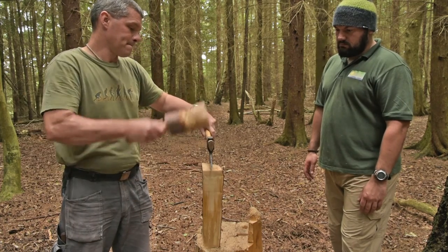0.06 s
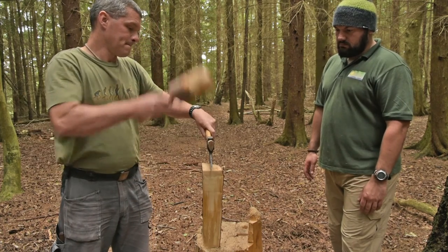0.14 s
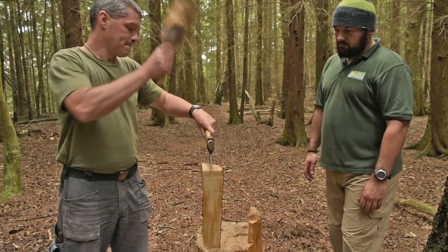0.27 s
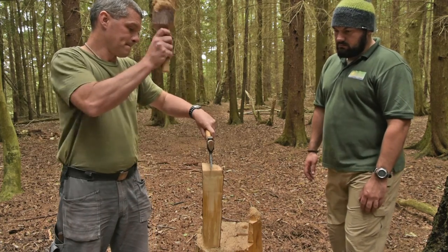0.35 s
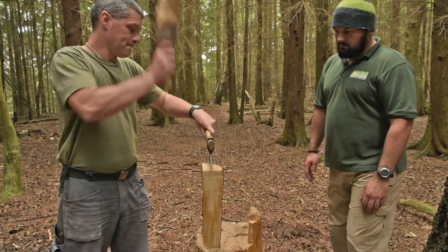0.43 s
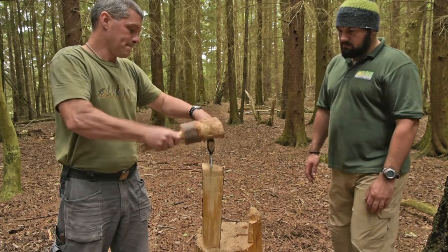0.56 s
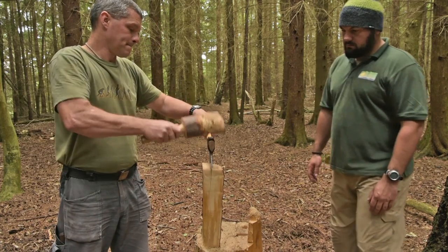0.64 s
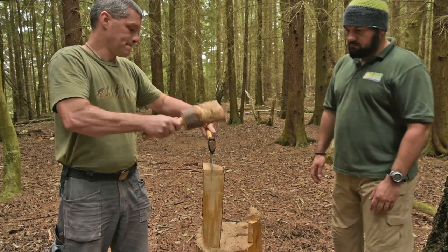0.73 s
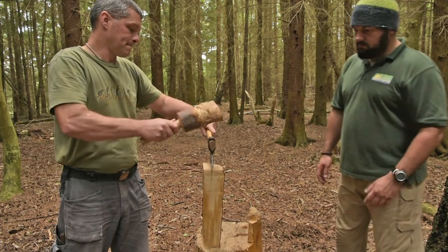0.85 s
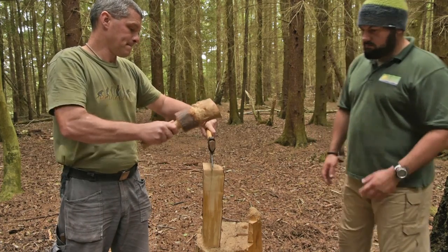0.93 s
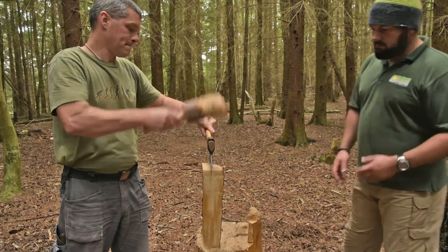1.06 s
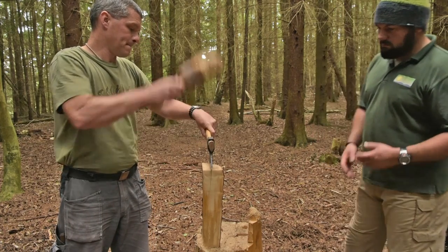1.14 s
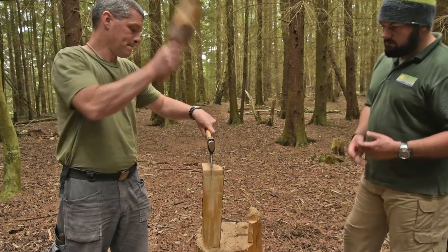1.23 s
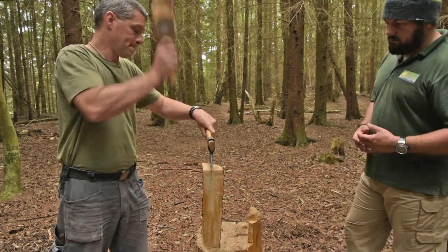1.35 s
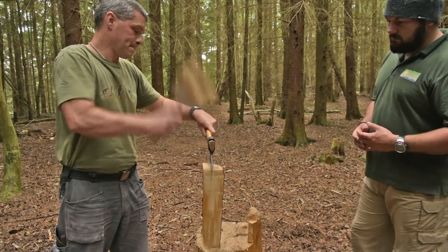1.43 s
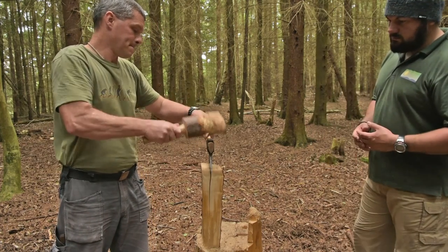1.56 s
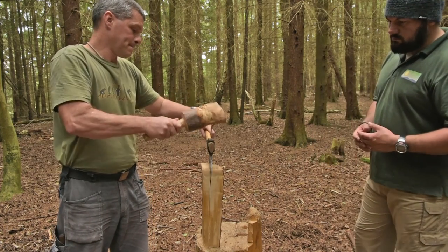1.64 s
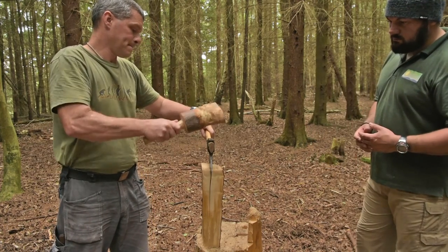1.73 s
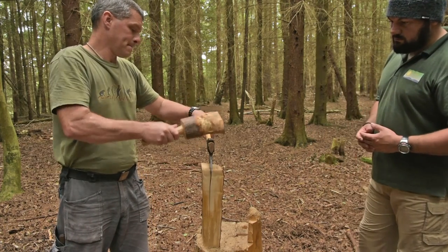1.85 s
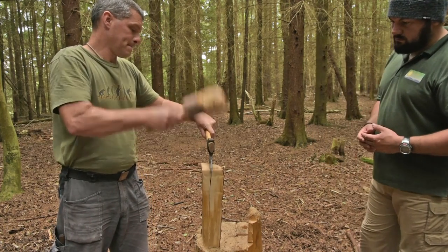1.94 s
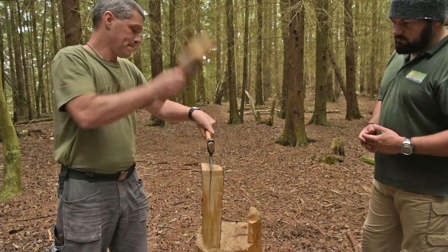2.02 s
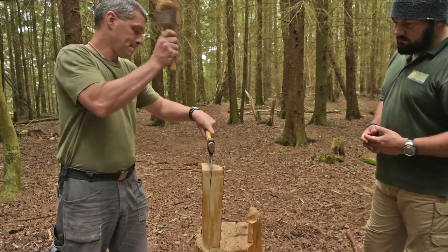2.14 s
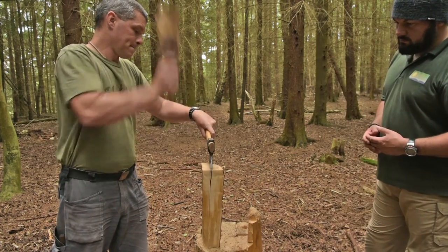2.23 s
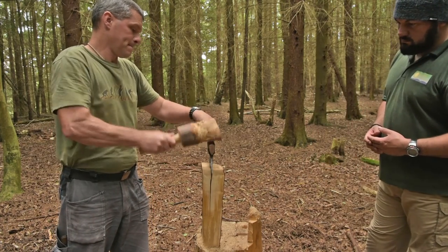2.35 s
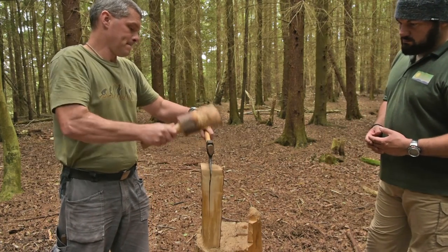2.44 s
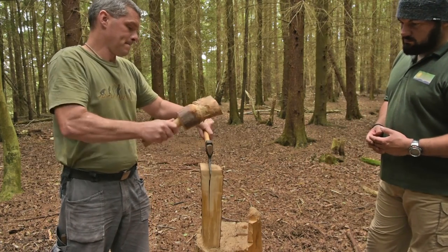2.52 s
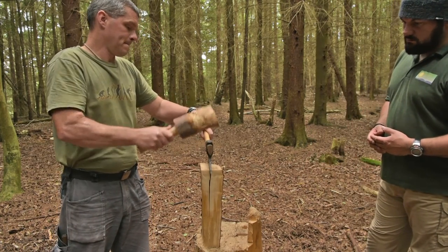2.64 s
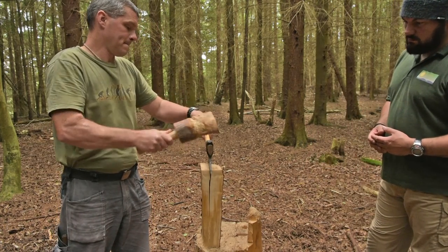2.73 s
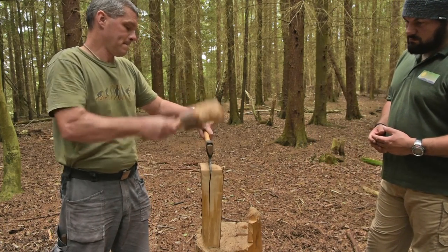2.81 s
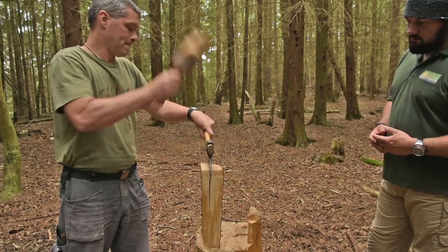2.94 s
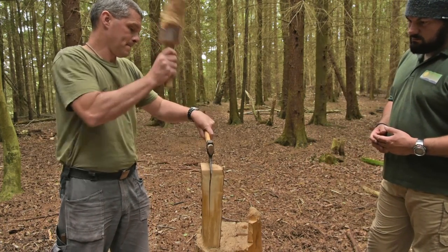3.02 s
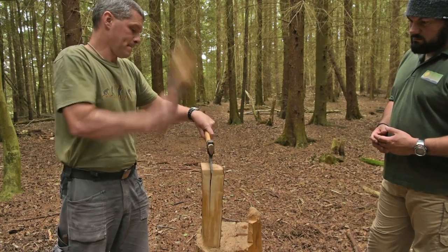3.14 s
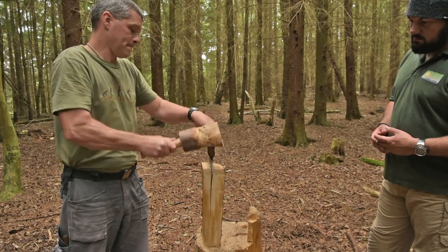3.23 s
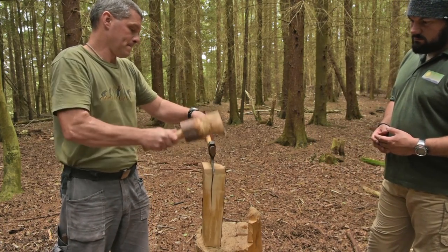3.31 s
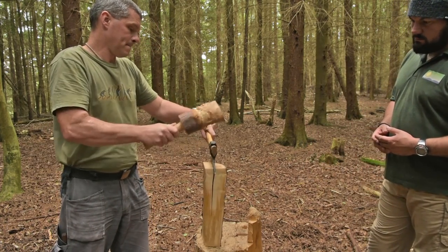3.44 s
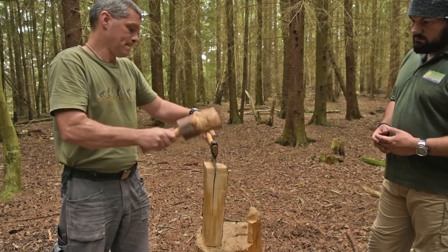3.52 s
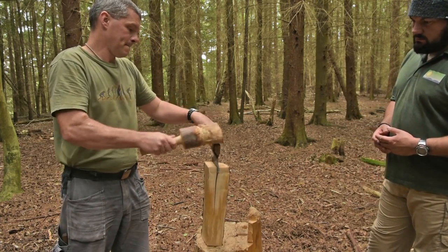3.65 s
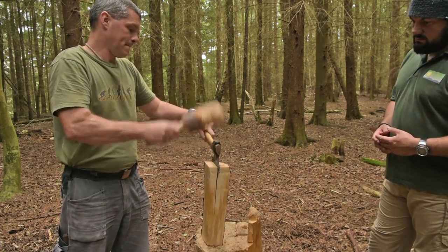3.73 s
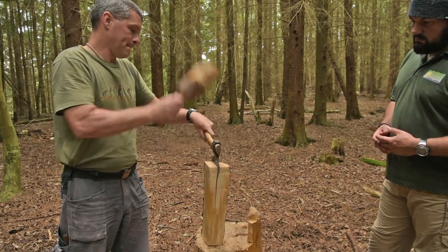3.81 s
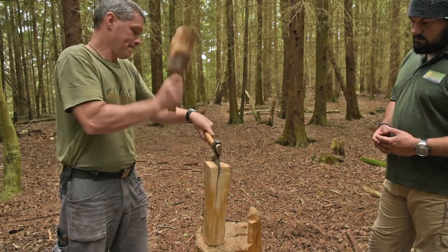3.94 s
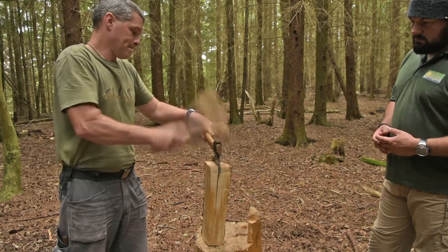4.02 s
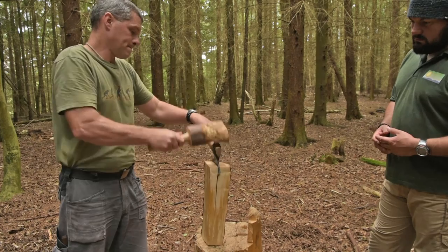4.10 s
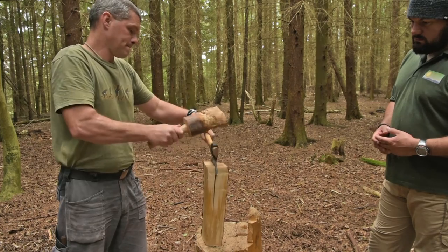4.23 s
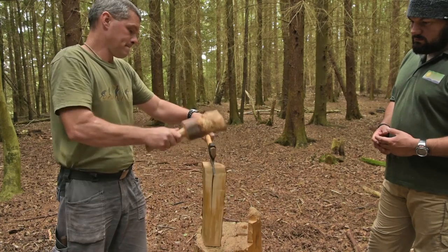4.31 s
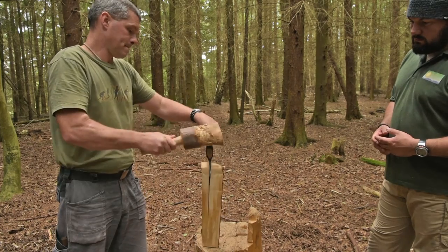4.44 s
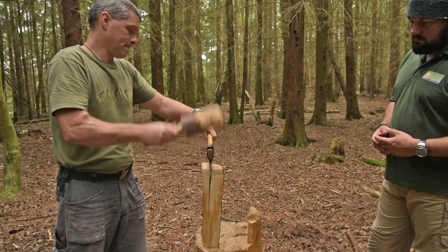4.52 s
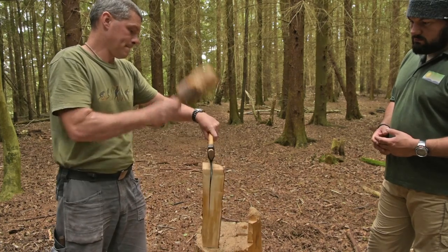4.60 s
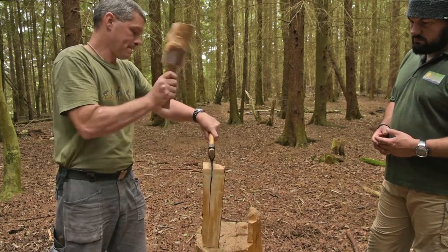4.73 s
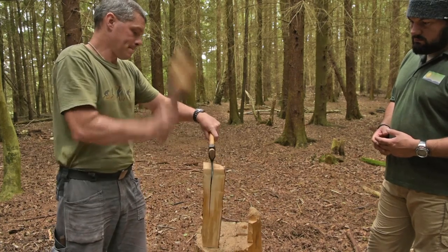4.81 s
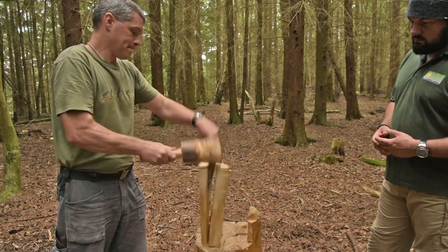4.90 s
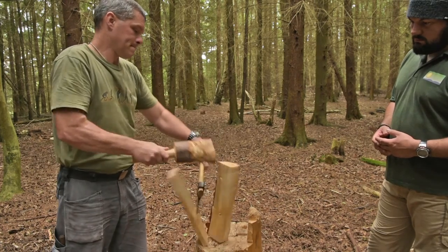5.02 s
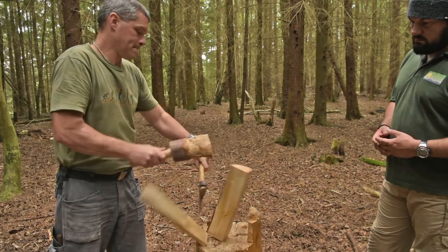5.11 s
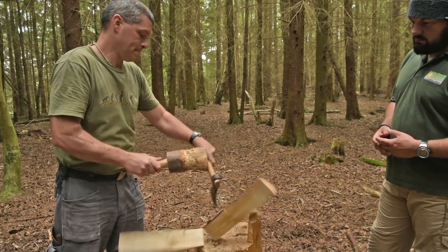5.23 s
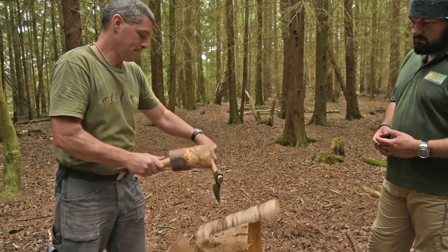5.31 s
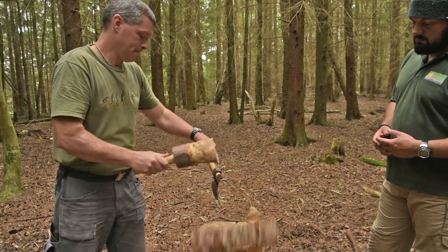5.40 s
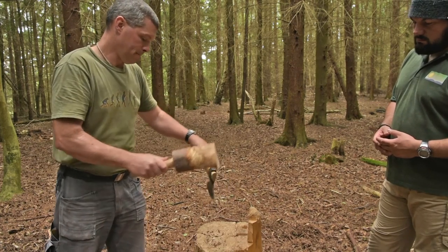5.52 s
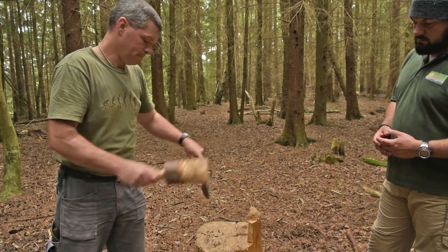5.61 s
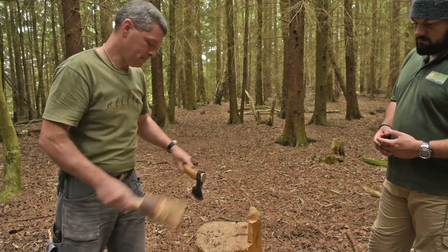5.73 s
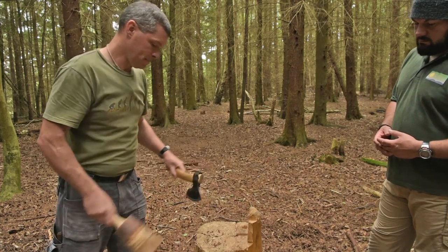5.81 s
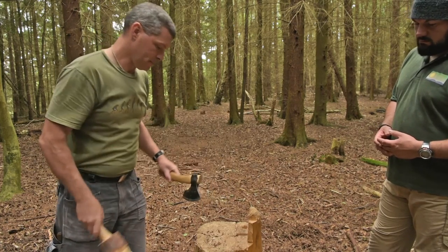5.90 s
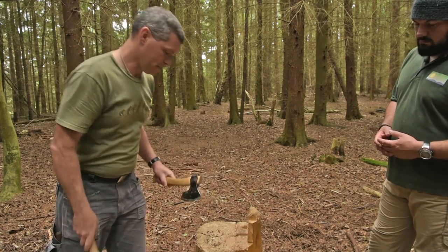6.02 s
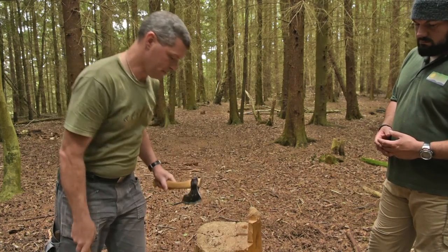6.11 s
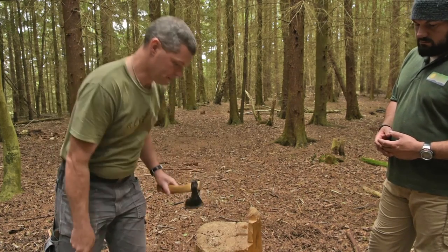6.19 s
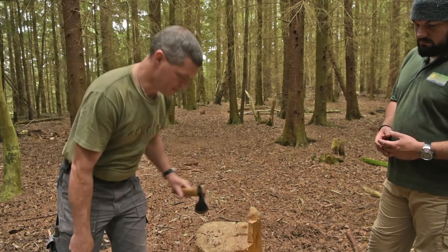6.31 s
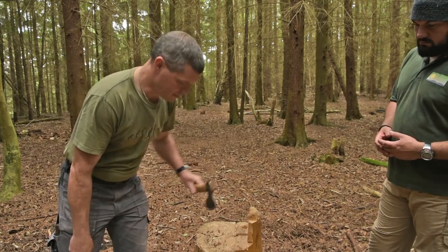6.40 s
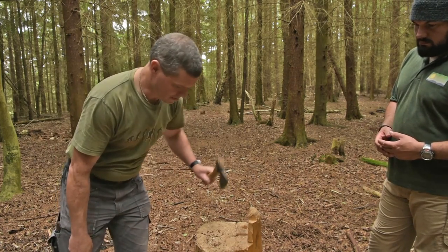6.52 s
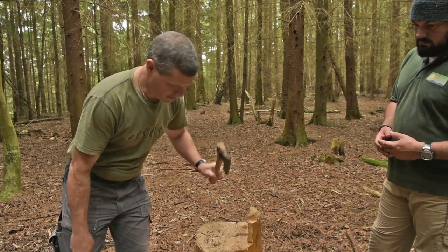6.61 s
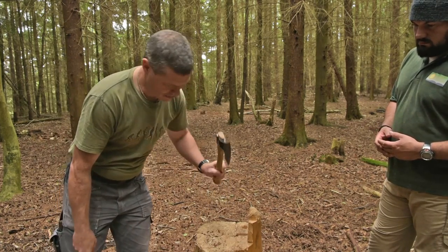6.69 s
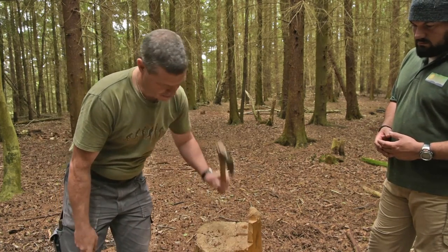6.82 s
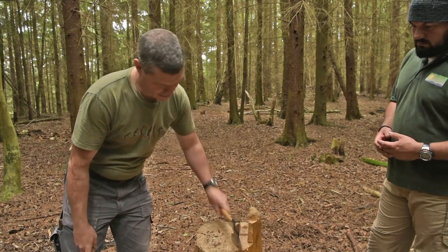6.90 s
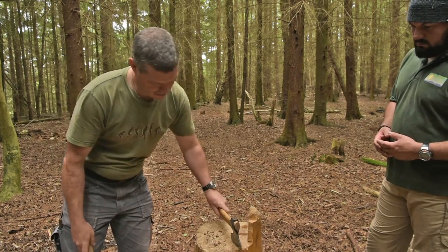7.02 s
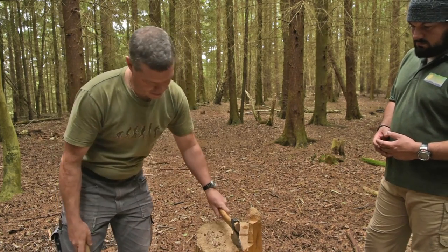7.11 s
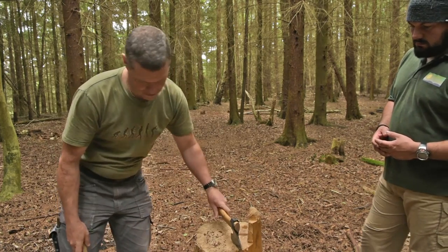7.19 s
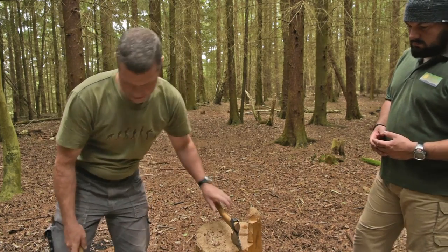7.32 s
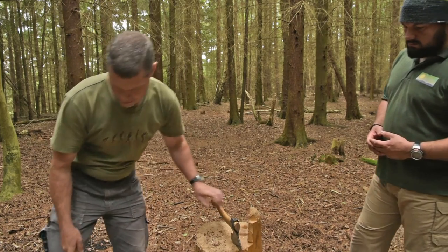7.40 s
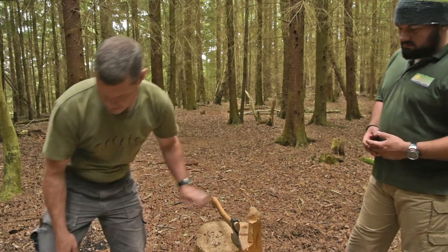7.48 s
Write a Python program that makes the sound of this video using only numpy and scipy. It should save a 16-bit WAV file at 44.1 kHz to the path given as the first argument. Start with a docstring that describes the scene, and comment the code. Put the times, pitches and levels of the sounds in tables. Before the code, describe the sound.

A wooden mallet knocks a hatchet into a log until it splits and the pieces clatter down, echoing through a forest.

```python
"""A wooden mallet drives a hatchet into a green log on a stump: six blows, and the last one splits it.
Each impact excites damped modes of hatchet and log and tears fibres, which crackle. The halves tumble
to the ground, the mallet is dropped and the hatchet is stuck into the stump. The trunks of a conifer
forest scatter every blow into a long echo. Twigs snap and sleeves rustle over still air and a soft hiss;
the loudest knocks overload the microphone."""
import sys
import numpy as np
from scipy import signal
from scipy.fft import rfft, irfft, next_fast_len
from scipy.io import wavfile
from scipy.ndimage import uniform_filter1d, minimum_filter1d

SR = 44100
rng = np.random.default_rng(int(sys.argv[2]) if len(sys.argv) > 2 else 0)


def to_wav(sig):
    """Store sig (one row per channel, or 1-D mono) as 16-bit WAV at the path in sys.argv[1].

    Samples outside -1..1 are clipped; the rate is SR.
    """
    pcm = np.clip(np.atleast_2d(sig), -1, 1) * 32767
    pcm = np.round(pcm).astype(np.int16)
    wavfile.write(sys.argv[1], SR, pcm.T)  # frames by channels


N = 332955
TIME = np.arange(N) / SR

# Mallet blows: t/s, ring/dB, thud/dB, crack/dB, loosened halves/dB, lag to the stump/s, tearing/dB
BLOWS = [(0.6301, -2, 3.5, -4, -17.5, .0054, -30.5), (1.5408, 0.5, -10, -2.3, -24, .0068, -21),
         (2.3954, 0.5, -2, -5.5, -12.5, .0073, -28.5), (3.2758, 1.5, -8, -3.3, -14.5, .0068, -31.5),
         (4.1147, 0, -7.5, -1.5, -8, .0074, -26.5), (4.9432, -8.5, -6, -0.5, -1.5, .0058, -19.7)]
SPLIT_S = BLOWS[-1][0]
# Modes of hatchet and log together, and of the halves as they come free: f/Hz, level/dB, T60/s
LOG_MODES = [(145, -22, .13), (245, -23, .06), (480, -14, .05), (660, -6, .06), (738, 0, .06),
             (905, -11, .05), (1040, -16, .05), (1330, -15, .045), (1640, -15, .05), (2520, -20, .06)]
HALF_MODES = [(652.7, 0.5, .05), (1116, 0, 0.084), (1350, -10.5, .04), (1619, -9.5, 0.12),
              (1830, -7, 0.074), (1960, -26, .05), (2260, -13, 0.067)]
# Noise spectra of a blow and of breaking wood: f/Hz, spectral level/dB
THUD_SPECTRUM = [(40, -14.5), (130, -12), (250, 0.5), (450, -4.5), (900, -3), (3000, -59.5)]
CRACK_SPECTRUM = [(100, -23), (500, 1), (900, 4), (1700, 0), (2700, -6), (3700, -12.5), (5100, -12),
                  (7500, -23), (12000, -31), (16000, -37)]
FIBRE_SPECTRUM = [(300, 2.5), (1200, -4), (3000, 3), (5500, 4.5), (8000, -7.5), (13000, -10.5),
                  (16000, -28.5)]
SPLINTER_SPECTRUM = [(500, -11), (2000, -1), (5000, 3), (9000, -4.5), (13000, -8.5), (16000, -12.5)]
# Decay times in the wood and among the trunks: f/Hz, T60/s
WOOD_DECAY = [(100, 0.033), (300, 0.049), (1000, .055), (4000, 0.04), (14000, .04)]
FOREST_DECAY = [(100, 0.42), (300, 3.3), (700, 1.86), (1800, 1.9), (3600, 1.8), (5400, 1.4), (8000, 0.67),
                (11000, 0.76), (15000, 0.26)]

# Lesser knocks: t/s, piece, level/dB, relative ring/dB
KNOCKS = [(0.637, "split", -17, 1), (0.697, "earth", -24, 1), (1.425, "earth", -44, -6),
          (3.726, "earth", -28, 4), (4.958, "split", -10.5, 6), (5.155, "twig", -26.5, -3),
          (5.337, "earth", -24, 2), (5.354, "clack", -26, -8), (5.497, "flat", -41, -2),
          (5.5222, "flat", -13.5, 7), (5.706, "earth", -29, 3), (5.7616, "end", -3, -6.5),
          (5.834, "earth", -21, 5), (6.0515, "clack", -1.5, -3), (6.122, "clack", -18, -2.5),
          (6.433, "mallet", -13, -6.5), (6.604, "mallet", -45, 11.5), (6.803, "twig", -49, -3),
          (6.9903, "stump", 2.5, 1), (7.0497, "clack", -23, -4)]
# Landing of each piece: grit/dB, contact T60 at full strength/s, then for its far end:
# delay/s (negative if it touches first), relative level/dB, relative ring/dB
LANDINGS = {"split": (-9, .048, .028, -11, -16), "flat": (-10, .048, .02, -21, -2),
            "end": (-19, .039, .0154, -13, 4), "clack": (-15, .037, .0255, -8, -22),
            "mallet": (-8, .023, -.007, -9, -5), "stump": (-20, .038, .02, -18, -12),
            "earth": (-32, .039, .018, -20, -6), "twig": (-21, .021, .01, -14, -6)}
# Modes of each piece: f/Hz, level/dB, T60/s
PIECE_MODES = { "split": [(2725, -1, .11), (2930, -12, .07), (1870, -9, .05), (2120, -9, .06)],
               "flat": [(110, -18, 0.22), (137.4, -14.5, 0.11), (194, -9, 0.077), (324.6, -4.5, 0.092),
               (393.5, 3.5, 0.048), (815, 0, 0.049), (1910, 0, 0.043), (4360, -28, .044)],
               "end": [(166.5, -12, 0.49), (316, -2, 0.066), (496, 2, 0.051), (596, -3, 0.065),
               (675, -5.5, 0.33), (927, -1.5, 0.092), (1093, -12, .07), (1380, -14, 0.22), (1713, -25, .05),
               (2955, -10.5, 0.05), (4300, -15, .05)], "clack": [(715, -11, 0.19), (1080, -10.5, .12),
               (1188, -7, 0.063), (1230, -7.5, 0.11), (1584, -0.5, 0.084), (1954, -6.5, 0.11),
               (2328, -8, 0.065), (3320, -12.5, .08), (3607, -15.5, 0.066), (4480, -13.5, 0.037)],
               "mallet": [(170.5, -15.5, 0.152), (239, -2, 0.0433), (533, -1, 0.042), (797, 1, .2),
               (2360, -7.5, 0.019), (3030, -11, 0.028)], "stump": [(136, -20, 0.16), (242, -3, 0.035),
               (367, -6, .04), (705, 5, 0.034), (781.6, -2.5, .09), (887, -5.5, 0.067), (1580, -31.5, .1),
               (1993, -25, 0.16)], "earth": [(170, -9.5, 0.11), (212, -5, 0.11), (312, -0.5, 0.017),
               (750, -16.5, .07)], "twig": [(1078, 2, .15), (1800, -15, .06)]}
# Contact noise of each piece, and crushed bark and needles: f/Hz, spectral level/dB
CONTACT_SPECTRA = {"split": [(180, -37.5), (300, -9), (726, -6.5), (2440, -15), (2730, -7.5), (3020, -12.5),
                   (5350, -28), (15000, -47.5)], "flat": [(24, -42), (40, -15.5), (346, 6), (554, -8),
                   (824, 0.5), (1030, -22), (1690, -21.5), (1870, -5.5), (2390, -20.5), (5160, -22),
                   (15000, -52.5)], "end": [(29, -67), (50, -13), (133, -16.5), (674, 1), (816, -10),
                   (1750, -8), (2570, -22.5), (4550, -19.5), (5250, -30), (5910, -23), (15000, -54.5)],
                   "clack": [(59, -58), (100, -44), (176, -6), (383, -34.5), (718, 9), (983, -19),
                   (1190, -2), (1590, -2.5), (2750, -21), (3680, -20), (4090, -40), (15000, -62.5)],
                   "mallet": [(35, -55.5), (60, -37), (199, 0), (564, -4.5), (1450, -8), (1790, -8.5),
                   (2360, -24.5), (3420, -24.5), (5430, -24), (15000, -52.5)], "stump": [(18, -55),
                   (30, -8), (240, -6), (472, -10), (754, -8), (1060, -13.5), (1730, -14), (1920, -11.5),
                   (2310, -36), (4310, -31.5), (15000, -51)], "earth": [(41, -42), (70, -30), (252, 1.5),
                   (534, -4), (770, -9), (982, -41), (1670, -20.5), (1960, -29.5), (9000, -52.5),
                   (11700, -95), (19800, -120)], "twig": [(240, -55), (400, -29), (1110, -3), (1400, -14.5),
                   (2240, -2), (2510, -11), (12000, -39), (15600, -69), (22000, -120)]}
GRIT_SPECTRUM = [(200, -14), (1200, -4), (3000, 3), (5500, 4), (8000, -7), (13000, -10.5), (16000, -28)]
# Splinters and dry twigs snapping: t/s, level/dB
SNAPS = [(1.607, -23), (2.11, -39), (5.032, -14), (5.836, -25), (6.257, -36), (6.9885, -21)]

# A blow as the trunks return it, and an old echo: f/Hz, spectral level/dB
ECHO_SPECTRUM = [(50, -19.5), (110, -9), (160, -6), (210, -19.5), (400, -14.5), (560, -4.5), (730, 2),
                 (900, -2), (1700, -6), (2700, -12), (3700, -18), (5300, -15.5), (8000, -23.5),
                 (15000, -32.5)]
OLD_ECHO_SPECTRUM = [(200, -9), (700, 1.5), (1700, -5.5), (2700, -10), (5000, -19), (9000, -46)]
# Resonances of the whole log and of its halves that linger in the echo: f/Hz, half-width/Hz, lift/dB
WHOLE_PEAKS = [(1600, 40, 5), (2560, 60, 7.5)]
HALF_PEAKS = [(1850, 115, 8)]

# Sleeves swishing and boots shifting in the needles: t/s, level/dB, Gaussian half-length/s
RUSTLES = [(0.43, -56.5, .05), (1.39, -54, .11), (5.28, -54.5, .11), (5.715, -47, .01),
           (5.845, -42.5, .025), (6.052, -36, .034), (6.13, -55, .14), (6.213, -44, .022),
           (6.42, -49.5, .033), (6.59, -48, .03), (7.42, -55, .073)]
# Rustle, forest air and hiss: f/Hz, spectral level/dB
CLOTH_SPECTRUM = [(300, 5), (1200, 1.5), (3000, -3), (5500, 2.5), (8500, -8), (15000, -19)]
AIR_SPECTRUM = [(15, -57.5), (25, -27.5), (44, -13.5), (70, 3.5), (87, -14), (123, -2.5), (153, -14),
                (180, -6), (384, -6), (531, -6.5), (677, -6.5), (962, -12), (1840, -19), (3160, -33),
                (16000, -30.5)]
HISS_SPECTRUM = [(500, -9.5), (2000, 0), (6000, -1), (10000, -5.5), (16000, -4)]


def blows(stump_db=-2, tick_db=1, echo_db=-14.6, peak_growth=.3, size=SR // 3):
    """Impact excitation: mallet strikes hatchet, then the log is rammed onto the stump and rings again."""
    out = np.zeros(N)
    for k, (s, ring_db, thud_db, crack_db, halves_db, lag, _) in enumerate(BLOWS):
        body = amp(ring_db) * ring(LOG_MODES, scatter_db=0.5, detune=0.0082, size=size)
        body += amp(halves_db) * ring(HALF_MODES, scatter_db=6, detune=0.0056, size=size)
        body += damped(amp(thud_db) * noise(THUD_SPECTRUM, size), WOOD_DECAY)
        tick = noise(FIBRE_SPECTRUM, size) * fade(t60=0.0035, size=size)  # wood first touches steel
        add(out, s, amp(crack_db + tick_db) * tick)
        for delay, db in [(0, 0), (lag, stump_db)]:  # both contacts ring alike, but each cracks anew
            crack = damped(grains(CRACK_SPECTRUM, spread_db=3, size=size), WOOD_DECAY)
            add(out, s + delay, amp(db) * (body + amp(crack_db) * crack))
        loosened = [(hz, width, lift + peak_growth * halves_db) for hz, width, lift in HALF_PEAKS]
        peaks = loosened if k else WHOLE_PEAKS  # only the first blow meets a whole log
        add(out, s, amp(echo_db) * forest_echo(resonant_spectrum(peaks)))
    return out


def tearing(lag_s=.007, direct_db=-1, echo_db=22, echo_growth=2.02, peel_db=-39, size=SR // 2):
    """Fracture: green fibres part just after each blow, and go on peeling as the halves fall apart."""
    out = np.zeros(N)
    for s, *_, tear_db in BLOWS:
        add(out, s + lag_s, amp(direct_db + tear_db) * crackle(t60=.18, size=size))
        # a long tear opens the log and carries much further
        add(out, s + lag_s, amp(echo_db + echo_growth * tear_db) * forest_echo(FIBRE_SPECTRUM))
    add(out, SPLIT_S + .08, amp(peel_db) * crackle(t60=.5, size=size))
    return out


def crackle(t60, size):
    """Acoustic emission: many fibres part, ever more faintly."""
    return grains(FIBRE_SPECTRUM, spread_db=5.5, size=size) * fade(t60, size)


def knocks(softening_db=25, far_scrape_db=3, echo_db=-30):
    """Double impact: a piece lands on one end, then the other; weaker contacts last longer."""
    out = np.zeros(N)
    for s, piece, db, ring_db in KNOCKS:
        grit_db, hard_t60, far_s, far_db, far_ring_db = LANDINGS[piece]
        near_end = (s, db, ring_db, grit_db)
        far_end = (s + far_s, db + far_db, ring_db + far_ring_db, grit_db + far_scrape_db)
        for when, level_db, note_db, scrape_db in (near_end, far_end):
            t60 = hard_t60 * 2 ** (-level_db / softening_db)
            add(out, when, amp(level_db) * contact(piece, note_db, scrape_db, t60))
        strongest_hz = max(PIECE_MODES[piece], key=lambda mode: mode[1])[0]
        peak = (strongest_hz, 130, 11)  # f/Hz, half-width/Hz, lift/dB
        echo = forest_echo(resonant_spectrum([peak]), size=SR * 3 // 4)
        add(out, s, amp(db + echo_db) * np.hypot(1, amp(ring_db)) * echo)
    return out


def contact(piece, ring_db, grit_db, t60, attack_s=0.0007, size=SR // 2):
    """Inelastic collision with wood or earth: crushed grit, a dry burst and the ring of the piece."""
    grit = grains(GRIT_SPECTRUM, spread_db=4, size=size) * fade(t60=.026, size=size)
    burst = noise(CONTACT_SPECTRA[piece], size) * fade(t60, size)
    note = ring(PIECE_MODES[piece], scatter_db=.7, detune=.002, size=size)
    return (amp(grit_db) * grit + burst) * rise(attack_s, size) + amp(ring_db) * note


def snaps(from_s=.08, until_s=.44, splinter_db=-27, count=9, size=SR // 20):
    """Brittle fracture: twigs break, and after the split the last splinters go, ever rarer and weaker."""
    out = np.zeros(N)
    progress = (np.arange(count) + rng.random(count)) / count
    delays = from_s * (until_s / from_s) ** (progress ** 2)
    splinters = [(SPLIT_S + delay, splinter_db - 20 * np.log10(delay / from_s)) for delay in delays]
    for s, db in SNAPS + splinters:
        add(out, s, amp(db) * noise(SPLINTER_SPECTRUM, size) * fade(t60=.009, size=size))
    return out


def forest_echo(spectrum, onset_s=0.0023, near_s=0.021, spreading=0.84, size=SR * 5 // 4):
    """Scattering by countless trunks: echoes weaken with distance, and the middle band lasts longest."""
    echoes = damped(grains(spectrum, spread_db=1, size=size), FOREST_DECAY)
    return echoes * rise(onset_s, size) / (1 + TIME[:size] / near_s) ** spreading


def resonant_spectrum(peaks):
    """Resonance: the notes of the struck wood raise peaks in the spectrum of its echo."""
    hz = np.geomspace(30, 16000, 600)
    lift = sum(lift_db / (1 + ((hz - peak_hz) / width_hz) ** 2) for peak_hz, width_hz, lift_db in peaks)
    return np.c_[hz, along(ECHO_SPECTRUM, hz) + lift]


def earlier_echo(level_db=-47, t60=1.3):
    """Reverberant decay: the echo of an earlier blow is still dying among the trees."""
    return amp(level_db) * fade(t60, N) * noise(OLD_ECHO_SPECTRUM, N)


def rustle():
    """Friction: cloth and dry needles give short swells of crisp grains."""
    swell = sum(amp(db) * np.exp(-((TIME - s) / half) ** 2 / 2) for s, db, half in RUSTLES)
    return swell * grains(CLOTH_SPECTRUM, spread_db=7, size=N)


def background(air_db=-55, early_db=-75.5, late_db=-57.7, swell_at_s=5.5, swell_s=.55):
    """Ambient noise: still forest air, and a soft hiss that swells once towards the end, then holds."""
    hiss_db = np.interp(TIME, [swell_at_s, swell_at_s + swell_s], [early_db, late_db])
    return amp(air_db) * noise(AIR_SPECTRUM, N) + amp(hiss_db) * noise(HISS_SPECTRUM, N)


def ring(modes, scatter_db, detune, size, rise_cycles=0.13):
    """Modal superposition: damped sinusoids, their levels and pitches drawn anew for each impact."""
    hz, db, t60 = np.transpose(modes)[:, :, None]
    level, shift = rng.standard_normal((2, len(modes), 1))
    signs = (-1) ** np.arange(len(modes))[:, None]
    waves = signs * np.sin(2 * np.pi * hz * (1 + detune * shift) * TIME[:size]) * fade(t60, size)
    return np.sum(amp(db + scatter_db * level) * waves * rise(rise_cycles / hz, size), axis=0)


def damped(x, decay, count=12):
    """Frequency-dependent damping: each band of x fades with its own T60."""
    hz = np.fft.rfftfreq(len(x), 1 / SR)
    centres = np.geomspace(80, 15000, count)
    shares = np.array([np.interp(np.log(hz + 1), np.log(centres), row) for row in np.eye(count)])
    bands = irfft(rfft(x) * shares, len(x))
    return np.sum(bands * fade(along(decay, centres)[:, None], len(x)), axis=0)


def grains(spectrum, spread_db, size):
    """Impulsive noise: dense impulses with a log-normal spread of size, coloured, at rms 1."""
    impulses = rng.standard_normal(size) * amp(spread_db * np.clip(rng.standard_normal(size), -3, 3))
    return coloured(impulses, spectrum)


def noise(spectrum, size):
    """Gaussian noise, coloured, at rms 1."""
    return coloured(rng.standard_normal(size), spectrum)


def coloured(x, spectrum):
    """Linear filtering: x weighted by a spectrum, then scaled to rms 1."""
    m = next_fast_len(len(x))
    gain = amp(along(spectrum, np.fft.rfftfreq(m, 1 / SR)))
    shaped = irfft(rfft(x, m) * gain, m)[:len(x)]
    return shaped / np.sqrt(np.mean(shaped ** 2) + 1e-20)


def fade(t60, size):
    """Exponential decay, by 60 dB in t60 seconds."""
    return np.exp(-np.log(1000) * TIME[:size] / t60)


def rise(seconds, size):
    """Smooth onset along a Gaussian curve."""
    return 1 - np.exp(-(TIME[:size] / seconds) ** 2)


def along(points, hz):
    """Interpolation of (f/Hz, value) points on a logarithmic frequency axis."""
    f, v = np.transpose(points)
    return np.interp(np.log(hz + 1), np.log(f + 1), v)


def amp(db):
    """Amplitude ratio of a level in decibels."""
    return 10 ** (np.asarray(db) / 20)


def add(track, s, sound):
    """Superposition of a sound on the track at time s."""
    start = max(0, round(s * SR))
    part = sound[:max(0, len(track) - start)]
    track[start:start + len(part)] += part


def scene():
    """Superposition of all sources at one microphone."""
    return (blows() + earlier_echo() + tearing() + snaps() + knocks() + rustle() + background())[None]


def record(dry, low_cut_hz=45, limit=2.06, hardness=8, top_hz=15800, edge_hz=800, window=SR // 400):
    """Overload: after a bass cut a fast limiter catches part of each peak, the rest clips; then a low-pass."""
    lean = signal.sosfilt(signal.butter(2, low_cut_hz, "highpass", fs=SR, output="sos"), dry)
    needed_gain = np.minimum(1, limit / (np.abs(lean) + 1e-9))
    held = lean * uniform_filter1d(minimum_filter1d(needed_gain, window), window)
    clipped = held / (1 + np.abs(held) ** hardness) ** (1 / hardness)
    m = next_fast_len(N + SR // 4)
    passband = np.clip((top_hz - np.fft.rfftfreq(m, 1 / SR)) / edge_hz + .5, 0, 1)
    return irfft(rfft(clipped, m) * passband, m)[..., :N]


dry = scene()
out = record(dry)
to_wav(out)
```